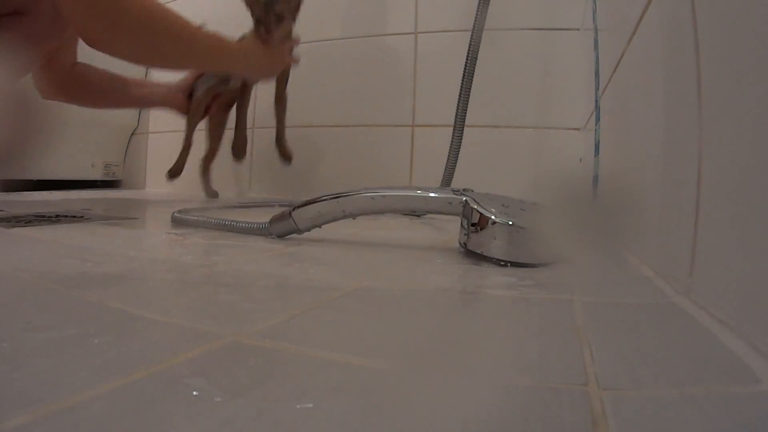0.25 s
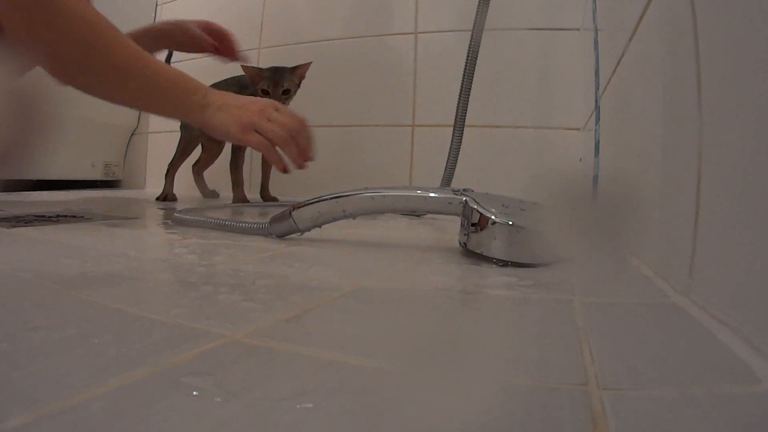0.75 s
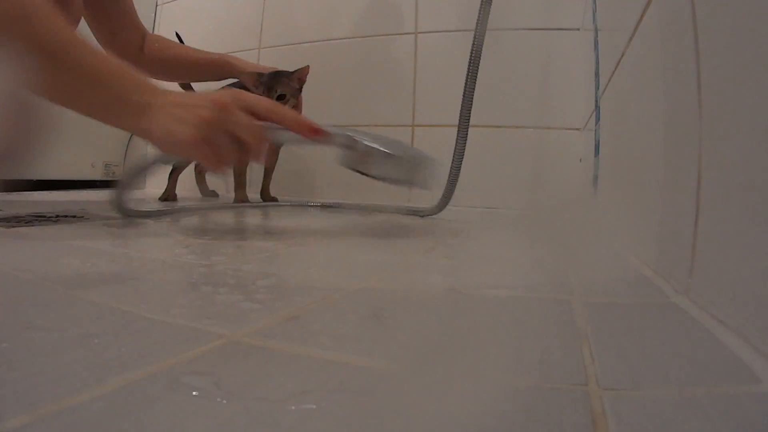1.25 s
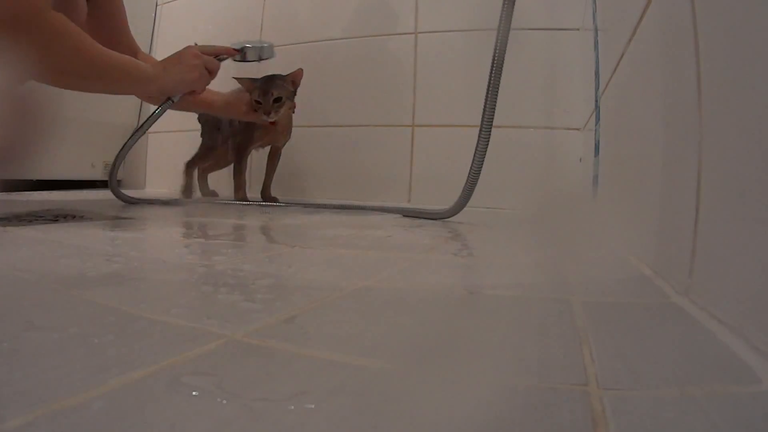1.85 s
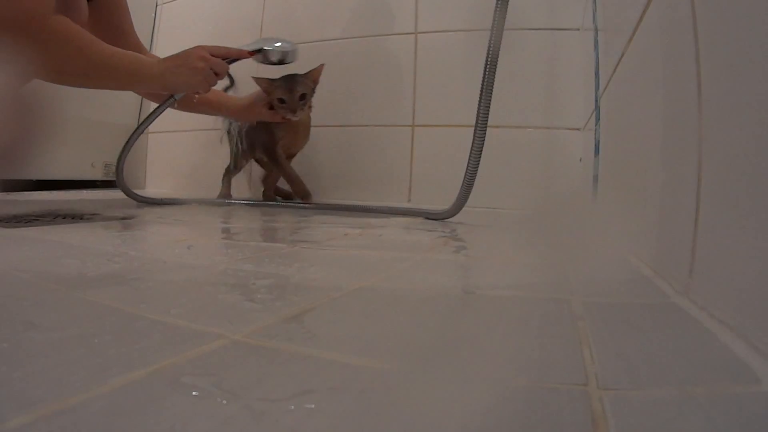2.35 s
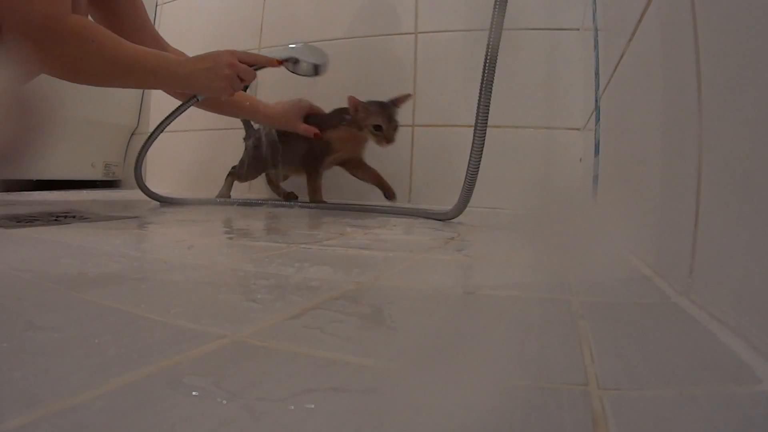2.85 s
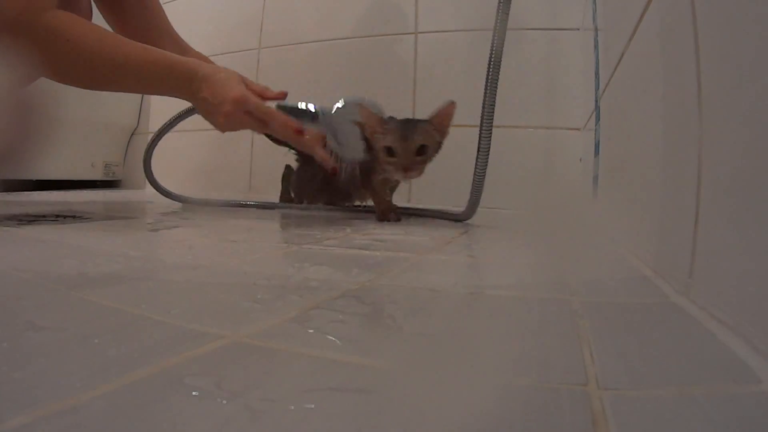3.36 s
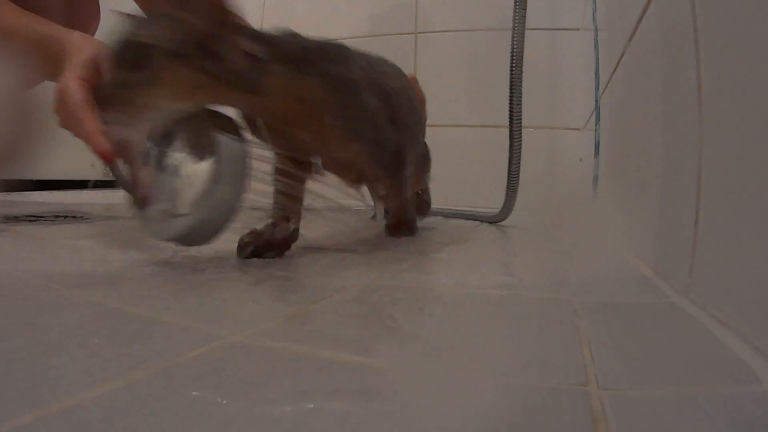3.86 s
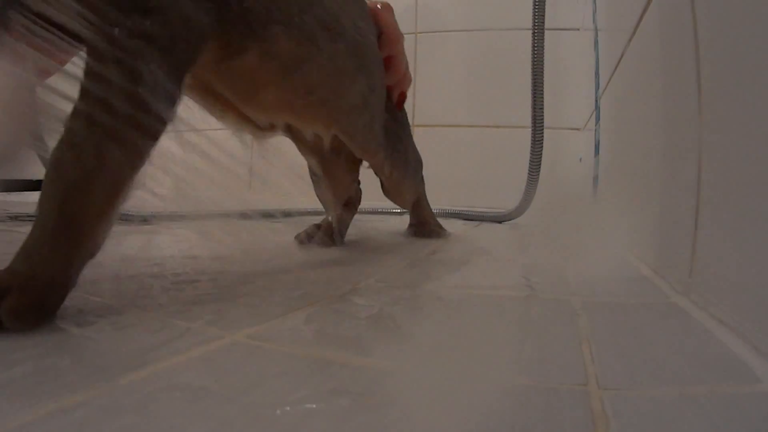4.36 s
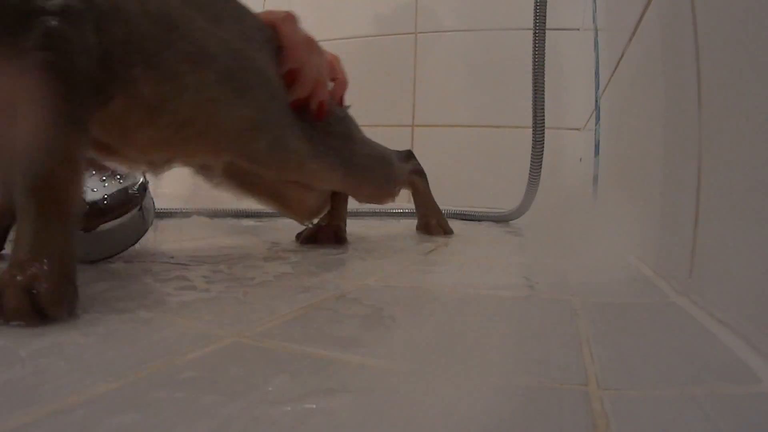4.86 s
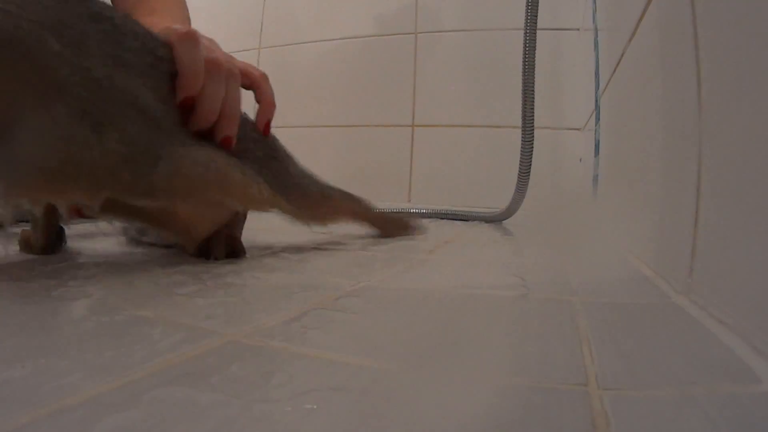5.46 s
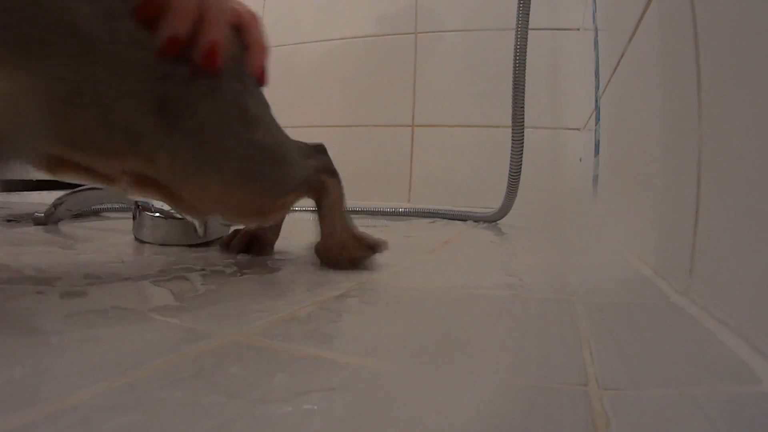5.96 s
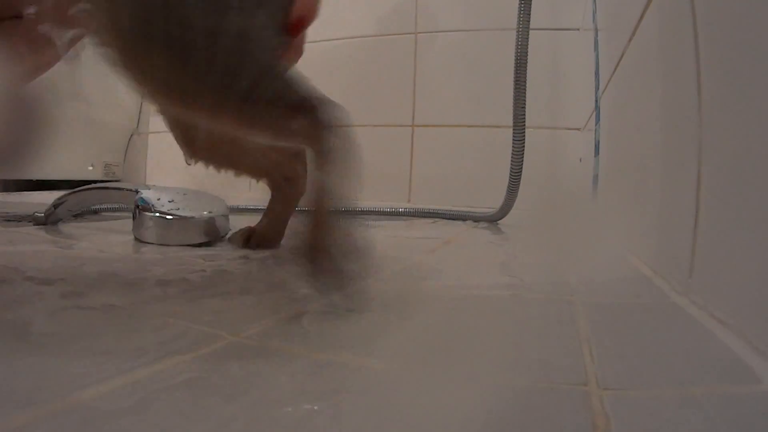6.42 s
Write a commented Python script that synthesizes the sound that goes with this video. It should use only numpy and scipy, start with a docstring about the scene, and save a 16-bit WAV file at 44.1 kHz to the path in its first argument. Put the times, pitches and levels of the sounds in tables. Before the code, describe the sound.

Bright, dense shower spray hisses close by on tiles, swishing and splashing with each move, with small plops, soft paw thumps and two clacks.

```python
"""In a tiled bathroom, a running shower head lies on the floor, is picked up, played over a wet cat and put down.
Its jets are random droplet clicks and tiny ringing bubbles, coloured by a hiss that changes as the head moves:
each swing slides the hiss downward and ends in a splash, and close passes ring in it. Big drops slap as bursts of
noise; paws, hose and plops are dying tones. The head knocks twice with ringing modes and noise, bouncing each time.
Below it all, drops, bubbles and noise make splashing, a low gurgle and a faint room rumble."""
import sys
import numpy as np
from scipy import signal
from scipy.fft import rfft, irfft, next_fast_len
from scipy.io import wavfile
from scipy.ndimage import uniform_filter1d, map_coordinates

SR = 44100
rng = np.random.default_rng(int(sys.argv[2]) if len(sys.argv) > 2 else 0)


def unload_wav(signal):
    """Save mono or channel-first audio to the path in sys.argv[1] as 16-bit WAV at rate SR, clipped to [-1, 1]."""
    wavfile.write(
        sys.argv[1],
        SR,
        np.round(np.clip(np.atleast_2d(signal).T, -1, 1) * 32767).astype(np.int16),
    )


N = 295010  # length of the scene in samples

# How closely the head faces the floor: time_s, closeness (0 to 1)
FACING_FLOOR = [(0, 0.88), (0.95, 0.9), (1.18, 0.5), (1.45, 0.02), (5.0, 0.05), (5.2, 0.24), (5.45, 0.29),
                (6.6, 0.24)]
# Basic tone of the hiss, relative levels: pitch_hz, level_db (per Hz)
HISS_SPECTRUM = [(900, -69), (1400, -22.5), (1750, -11), (2250, 0), (3500, -3.5), (4500, -3.5),
                 (6000, -1.5), (7200, -4.5), (8400, -0.5), (9500, -11), (10300, -13.5), (12000, -55.5)]
# Swings raking the jets across the floor: middle_s, half_length_s, strength_db, hiss_peak_hz (at mid-swing)
JET_SWINGS = [(1.43, 0.2, 5.5, 2530), (3.383, 0.12, 3.5, 1800), (5.414, 0.16, 8.5, 2290)]


def spray():
    """Jets of droplets and tiny bubbles, with a fine high mist that is favoured while the head faces the floor."""
    # Loudness of the spray before the jets' own gain and surges: time_s, level_db
    flow = [(0.0, -24.5), (1.12, -25), (1.43, -21.5), (1.79, -27), (2.52, -26.5), (2.57, -27.5),
            (3.91, -22.5), (4.21, -25), (4.28, -23), (4.99, -24.5), (5.09, -22), (5.35, -24.5),
            (5.37, -22.5), (5.44, -25.5), (5.65, -28), (5.85, -25), (6.07, -26.5), (6.69, -25)]
    # Where the jets land: time_s, left_minus_right_db
    place = [(0.5, -0.6), (3.3, -0.2), (4.3, 1.4), (6.5, 0.6)]
    # Tone of the mist, relative levels: pitch_hz, level_db (per Hz)
    mist_spectrum = [(8500, -32), (9600, 4.5), (10100, 9), (10500, 13), (11000, 6.5), (12000, -78)]
    spray_db, = curves(flow)
    facing, = curves(FACING_FLOOR)
    pan_db, = curves(place)
    surge_db = 0.44 * wobble(21) + 0.25 * wobble(60)  # the jets break up unevenly

    fizz = bubbles(rate=1400, centre_hz=5833, octaves=0.399, cycles=42, spread_db=4.0)
    drops = impacts(rate=14000, spread_db=3.5) + amp(-10.5) * fizz
    patter = scattered(bathroom(drops, wet_db=-10), diffuse_db=-7)
    jets = amp(spray_db + 0.77 + surge_db) * aimed(patter, patchy_db=1.5)

    # the mist grows 1.4 dB for each dB of spray, and by up to 7.5 dB as the head faces the floor
    mist_db = -37.5 + 1.4 * (spray_db - spray_db.mean()) + 7.5 * facing + wobble(13)
    fine_drops = scattered(impacts(rate=9000, spread_db=2.5), diffuse_db=-3.0)
    mist = amp(mist_db + surge_db) * coloured(fine_drops, mist_spectrum)
    return (jets + mist) * amp(np.array([pan_db, -pan_db]) / 2)


def aimed(x, patchy_db):
    """Colour the spray by where the jets point: a swing slides the hiss downward, a close pass rings in it."""
    # Resonances of the spray: pitch_hz, width_hz, held_db, resting_db
    rings = [(2573, 127, 4.5, 4.5), (2900, 130, 5, 5), (3240, 100, 1.5, 5), (3570, 160, 0.5, -5.5),
             (4010, 330, 5.5, -2), (3993, 84, 2.5, 14), (5050, 365, 7.5, -0.5), (6506, 370, 4, 5),
             (7550, 430, 3, -2.5), (8640, 210, -3.5, 6.5)]
    # Jets pass over something close, which rings: middle_s, half_length_s, pitch_hz, boost_db
    passes = [(3.53, 0.075, 5350, 4), (3.877, 0.18, 7040, 9.5), (4.35, 0.31, 3500, 6.5),
              (4.65, 0.27, 5160, 3), (5.12, 0.17, 5880, 7), (5.19, 0.1, 3870, 8), (6.15, 0.25, 7370, 5.5)]
    fall_oct_per_s, swing_width_oct, pass_width_oct = 9, 1.5, 0.16
    hz, t, z = signal.stft(x, SR, nperseg=1024)
    hz = hz[:, None]
    octave = np.log2(hz + 1)
    facing = np.interp(t, *np.transpose(FACING_FLOOR))
    colour_db = along(HISS_SPECTRUM, hz)
    for pitch, width, held_db, resting_db in rings:
        colour_db = colour_db + bell(hz, pitch, width) * (held_db + (resting_db - held_db) * facing)
    for middle, half, db, peak_hz in JET_SWINGS:
        centre = np.log2(peak_hz) - fall_oct_per_s * (t - middle)
        colour_db = colour_db + db * bell(t, middle, half) * bell(octave, centre, swing_width_oct)
    for middle, half, pitch, db in passes:
        colour_db = colour_db + db * bell(t, middle, half) * bell(octave, np.log2(pitch), pass_width_oct)
    # smooth random patches over pitch, then over time
    patches = uniform_filter1d(rng.standard_normal(colour_db.shape), size=6, axis=0)
    patches = uniform_filter1d(patches, size=7, axis=1)
    gain = amp(colour_db + patchy_db * unit(patches))
    gain = gain / np.linalg.norm(gain, axis=0)  # changes the tone, not the overall gain
    return unit(signal.istft(z * gain, SR, nperseg=1024)[1][:, :N])


def knocks():
    """The head hits the tiles: every touch clacks as noise and rings its modes at new strengths, echoed by the room."""
    # Modes of the head on the floor, before a random change at each touch: pitch_hz, level_db, t60_s
    head_modes = [(112, -8, 0.17), (149, -14.5, 0.2), (303.6, -7.5, .17), (334, -14.5, 0.21),
                  (439, 1, 0.12), (485, -0.5, 0.086), (616, 4.5, 0.07), (760, -11, .16), (840, -21, .14),
                  (1030, -8, 0.15), (1215, -12, 0.13), (1700, -17, .15), (1637, -17, .16)]
    # Tone of the clack before brightening, relative levels: pitch_hz, level_db (per Hz)
    clack_spectrum = [(60, -37), (200, -16), (500, 6), (1000, 2.5), (1600, 3), (3000, -2.5), (6000, -9),
                      (11000, -12)]
    out, t = np.zeros(N), np.arange(SR // 2) / SR
    for start, ring_db, clack_db, bright in contacts():
        ring = np.zeros(len(t))
        for hz, db, t60 in head_modes:
            strength_db = db + rng.normal(0, 1.5)
            ring += amp(strength_db - 60 * t / t60) * np.sin(2 * np.pi * hz * t)
        ring *= 1 - np.exp(-t / 0.00048)  # soft start
        colour = [(hz, db + bright * np.log2(hz)) for hz, db in clack_spectrum]
        fade = amp(-60 * t / 0.026) + amp(-13.0 - 60 * t / 0.14)  # a quick crack and a weaker, longer tail
        clack = fade * coloured(rng.standard_normal(len(t)), colour)
        add(out, start, amp(ring_db) * ring + amp(clack_db) * clack)
    return bathroom(low_cut(out, hz=85), wet_db=-3)


def contacts():
    """List every touch: each knock bounces twice, and each landing touches one rim and then the other."""
    # First touch of each knock, levels before modes and fades: start_s, ring_db, clack_db, brightness_db_per_octave
    knock_times = [(4.7, -28.5, -14.5, 0.2), (5.356, -45, -18, 2)]
    bounce_s, bounce_loss_db = 0.0235, 11.5  # time between landings, loss at each
    rims = [(0, 0), (0.0065, 4.5)]  # delay in s and loss in dB: the far rim follows, more softly
    touches = []
    for start, ring_db, clack_db, bright in knock_times:
        for landing in range(3):
            for lag_s, rim_loss_db in rims:
                loss_db = landing * bounce_loss_db + rim_loss_db
                time = start + landing * bounce_s + lag_s
                touches.append((time, ring_db - loss_db, clack_db - loss_db, bright))
    return touches


def slaps():
    """Each big drop slaps the tiles in a few milliseconds of spatter, made from fading noise."""
    # Big drops, levels before the cut and fade below: start_s, level_db
    big_drops = [(2.9846, -15.5), (3.1894, -11.5), (3.274, -16), (5.424, -12.5), (5.5692, -16.5)]
    out, t = np.zeros(N), np.arange(SR // 20) / SR
    for start, db in big_drops:
        spatter = coloured(rng.standard_normal(len(t)), HISS_SPECTRUM)
        add(out, start, amp(db - 4.5 - 60 * t / 0.033) * spatter)
    return bathroom(low_cut(out, hz=600), wet_db=-7)


def plops():
    """Short hollow plops, plinks and taps: quickly dying tones with almost no bass."""
    # Levels before the soft start and bass cut: start_s, level_db, pitch_hz, t60_s
    plop_tones = [(2.272, -24.5, 2040, .04), (2.307, -26.5, 864, 0.025), (3.368, -28.5, 1430, 0.052),
                  (3.6635, -1, 1235, 0.0072), (3.82, -23.5, 1560, 0.045), (3.87, -34, 1600, 0.094),
                  (4.665, -1, 4950, 0.0066), (5.05, -18.5, 1970, 0.021), (5.81, -33, 836, 0.05),
                  (6.0, -37.5, 730, 0.045), (6.496, -18.5, 1070, 0.01)]
    return bathroom(low_cut(damped(plop_tones, attack=0.00037), hz=380), wet_db=-11.5)


def thumps():
    """Soft thumps of paws and hose, and the low body of the head's second knock: low dying tones that start
    gently."""
    # Levels before the soft start: start_s, level_db, pitch_hz, t60_s
    thump_tones = [(2.926, -46.5, 176.5, 0.36), (3.345, -41, 150, 0.16), (3.455, -35.5, 135, 0.049),
                   (3.664, -31.5, 148, 0.069), (3.705, -32.5, 65, 0.045), (3.82, -47, 161, 0.16),
                   (5.356, -64, 137, 0.24), (5.385, -31.5, 150, 0.086)]
    return bathroom(damped(thump_tones, attack=0.0049), wet_db=-10)


def damped(rows, attack):
    """One quickly dying tone for each row, with a soft start lasting about attack seconds."""
    out, t = np.zeros(N), np.arange(SR // 3) / SR
    for start, db, hz, t60 in rows:
        tone = amp(db - 60 * t / t60) * np.sin(2 * np.pi * hz * t)
        add(out, start, tone * (1 - np.exp(-t / attack)))
    return out


def puddle():
    """Drops and bubbles splash and gurgle on the floor, over the room's faint rumble of low noise."""
    # Water running on the floor; only the rise above its average is used: time_s, level_db
    running_water = [(0.0, -59.5), (1.45, -56), (1.6, -50), (1.88, -61.5), (3.11, -60), (3.39, -55.5),
                     (4.3, -55.5), (4.47, -59), (5.35, -55.5), (5.51, -56), (6.3, -57.5), (6.69, -57)]
    # Tones of the three layers, relative levels: pitch_hz, level_db (per Hz)
    splash_spectrum = [(400, -32.5), (680, -16.5), (830, -4.5), (1050, -0.5), (1300, -0.5), (1650, 5.5),
                       (2100, 0.5), (3000, -51)]
    gurgle_spectrum = [(120, -22), (250, -5.5), (400, -5.5), (560, 1.5), (750, -2), (1200, -13)]
    rumble_spectrum = [(20, -14), (45, -3.5), (80, -3), (110, -0.5), (155, 1), (220, -3.5), (500, -3.5),
                       (1500, -53)]
    water_db, = curves(running_water)
    rise_db = water_db - water_db.mean()

    # a splash ends each swing: later, shorter and with a little less strength
    splash_db = -45 + 0.8 * rise_db + 0.84 * swing_db(lag=0.043, length=0.63)
    froth = bathroom(bubbles(rate=250, centre_hz=1274, octaves=0.387, cycles=37, spread_db=3.5), wet_db=0)
    slosh = scattered(impacts(rate=2500, spread_db=6.0), diffuse_db=1.0) + amp(-11.0) * froth
    splash = amp(splash_db + 0.82 * wobble(16)) * coloured(slosh, splash_spectrum)

    gurgle_db = -55.5 + 1.2 * rise_db
    glugs = bubbles(rate=150, centre_hz=526, octaves=0.57, cycles=13, spread_db=6.5)
    wash = scattered(impacts(rate=900, spread_db=1), diffuse_db=9.5) + amp(-14) * glugs
    gurgle = amp(gurgle_db + 1.3 * wobble(12)) * coloured(wash, gurgle_spectrum)

    rumble = coloured(scattered(rng.standard_normal(N), diffuse_db=-0.5), rumble_spectrum)
    return splash + gurgle + amp(-63) * rumble


def swing_db(lag, length):
    """How hard the jets rake the floor, delayed by lag seconds, with each swing's length multiplied by length."""
    t = np.arange(N) / SR
    return sum(db * bell(t, middle + lag, half * length) for middle, half, db, _ in JET_SWINGS)


def impacts(rate, spread_db):
    """Droplets landing at random, rate a second: single clicks of varied size, pushing or pulling."""
    count = int(rate * N / SR)
    size = amp(spread_db * np.clip(rng.standard_normal(count), -3, 3))
    size = size * rng.choice([-1, 1], count)
    return unit(np.bincount(rng.integers(0, N, count), size, N))


def bubbles(rate, centre_hz, octaves, cycles, spread_db):
    """Small bubbles, rate a second: each dies by 60 dB over some cycles and rises slightly in pitch."""
    count = int(rate * N / SR)
    pitch, size = np.clip(rng.standard_normal((count, 2)), -2.5, 2.5).T[:, :, None]
    k = np.arange(768)
    hz = centre_hz * 2 ** (octaves * pitch)
    age = hz * k / SR / cycles  # reaches 1 when the bubble is 60 dB down
    ring = amp(spread_db * size - 60 * age) * np.sin(2 * np.pi * cycles * age * (1 + 0.027 * age))
    places = rng.integers(0, N, (count, 1)) + k
    return unit(np.bincount(places.ravel(), ring.ravel(), N)[:N])


def scattered(x, diffuse_db):
    """Drops land all over, so their echoes merge into a wash: steady noise, different at each microphone."""
    return x + amp(diffuse_db) * rng.standard_normal((2, N))


def bathroom(x, wet_db):
    """Direct sound plus the tiled room's answer, a fading noise tail that differs at each microphone."""
    # How long echoes last: pitch_hz, t60_s
    echo_times = [(100, 0.21), (1000, 0.27), (4000, 0.36), (11000, 0.053)]
    hz, t, z = signal.stft(rng.standard_normal((2, SR // 2)), SR, nperseg=256)
    fade = amp(-60 * t / along(echo_times, hz)[:, None])
    tail = signal.istft(z * fade, SR, nperseg=256)[1]
    tail = np.pad(tail / np.linalg.norm(tail[0]), ((0, 0), (SR // 400, 0)))  # echoes begin 2.5 ms late
    return x + amp(wet_db) * signal.fftconvolve(x[None], tail, axes=1)[:, :len(x)]


def low_cut(x, hz):
    """Small things radiate little bass, so remove what lies below hz."""
    return signal.sosfilt(signal.butter(4, hz, "high", fs=SR, output="sos"), x)


def amp(db):
    """Decibels to gain."""
    return 10 ** (np.asarray(db) / 20)


def unit(x):
    """Scaled to an rms (average strength) of 1."""
    return x / np.sqrt(np.mean(x ** 2) + 1e-20)


def along(points, hz):
    """Read (Hz, value) points at any pitch, on a log axis."""
    f, v = np.transpose(points)
    return np.interp(np.log(hz + 1), np.log(f + 1), v)


def curves(rows):
    """One value per sample for each column after the time."""
    s, *cols = np.transpose(rows)
    return [np.interp(np.arange(N) / SR, s, c) for c in cols]


def bell(x, centre, width):
    """A smooth bump of height 1."""
    return np.exp(-((x - centre) / width) ** 2)


def wobble(rate):
    """A smooth random curve through rate random points a second."""
    return map_coordinates(rng.standard_normal(int(N * rate / SR) + 4), [np.arange(N) * rate / SR])


def filtered(x, response):
    """Multiply the spectrum of x by a response that depends on pitch."""
    size = x.shape[-1]
    m = next_fast_len(size + 8192)
    return irfft(rfft(x, m) * response(np.fft.rfftfreq(m, 1 / SR)), m)[..., :size]


def coloured(x, spectrum):
    """Filter x by a table of levels, then scale it to rms 1."""
    return unit(filtered(x, lambda hz: amp(along(spectrum, hz))))


def add(track, s, sound):
    """Mix a sound into a track at time s in seconds."""
    part = track[..., round(s * SR):][..., :sound.shape[-1]]
    part += sound[..., :part.shape[-1]]


def scene():
    """Water, paws and shower head in one small tiled room."""
    return spray() + knocks() + slaps() + plops() + thumps() + puddle()


def record(dry):
    """Two microphone ports resonate differently, changing the stereo width and balance; the top treble is cut off."""
    # Port resonances: pitch_hz, width_hz, side_db, left_minus_right_db (of the middle signal)
    ports = [(580, 300, 8, 2.5), (1020, 570, -1, -7), (2210, 190, 5.5, 5), (3260, 470, -3, -1.5),
             (4980, 250, -9, 0.5), (7300, 620, 6, -3.5)]
    top_hz = 11100

    def width_gain(hz):
        return amp(sum(db * bell(hz, c, w) for c, w, db, _ in ports))

    def tilt_share(hz):
        tilt = amp(sum(db * bell(hz, c, w) for c, w, _, db in ports))
        return (tilt - 1) / (tilt + 1)

    mid = dry.mean(axis=0)
    side = filtered((dry[0] - dry[1]) / 2, width_gain) + filtered(mid, tilt_share)
    return filtered(np.array([mid + side, mid - side]), lambda hz: 1 / (1 + (hz / top_hz) ** 500))


dry = scene()
out = record(dry)
unload_wav(out)
```